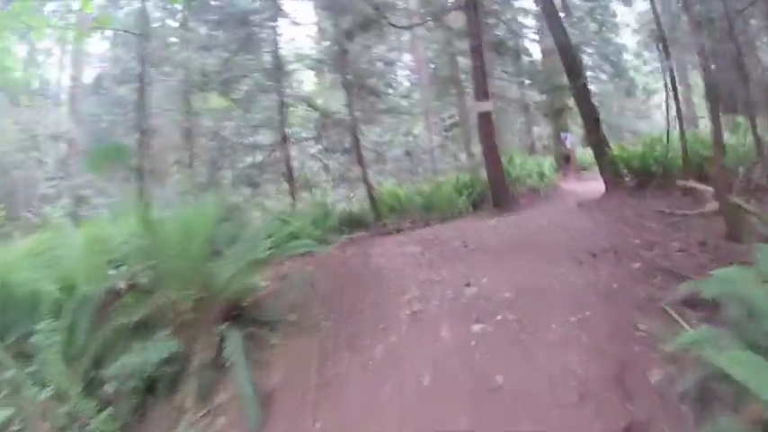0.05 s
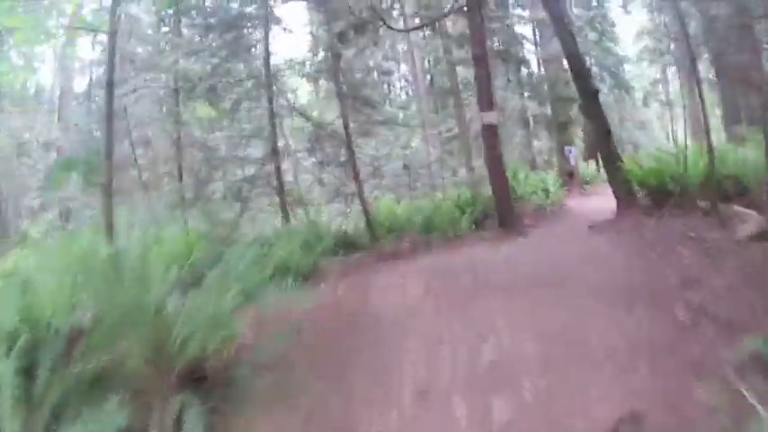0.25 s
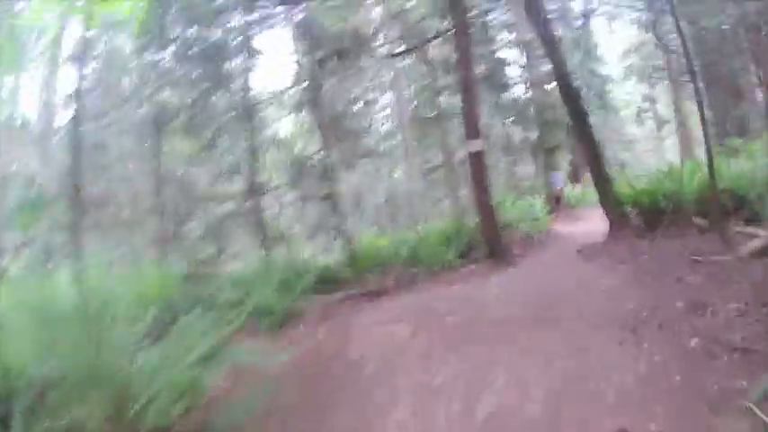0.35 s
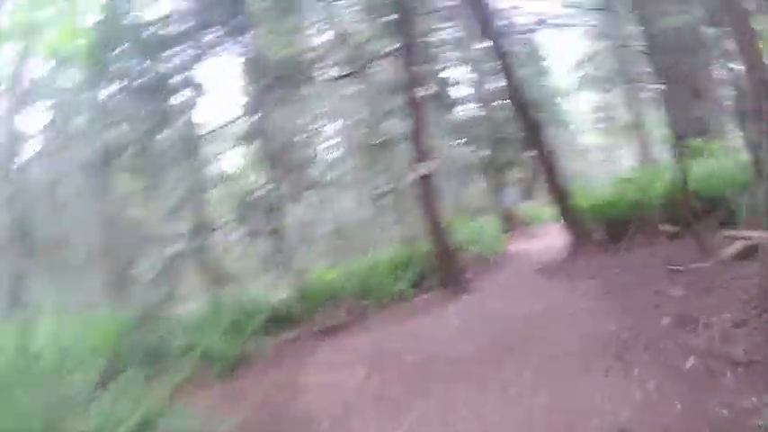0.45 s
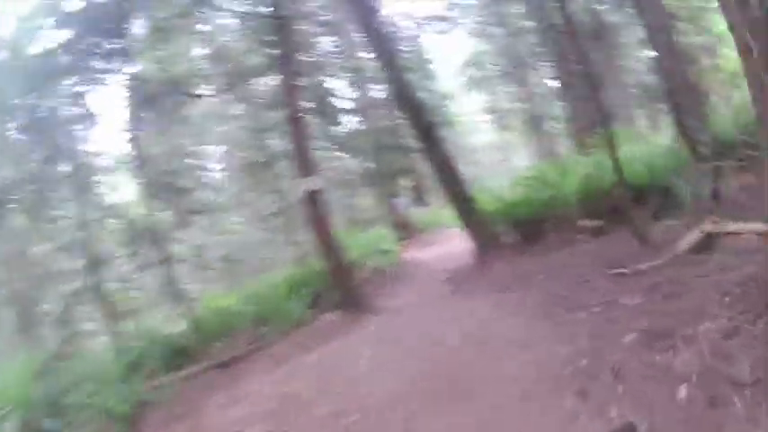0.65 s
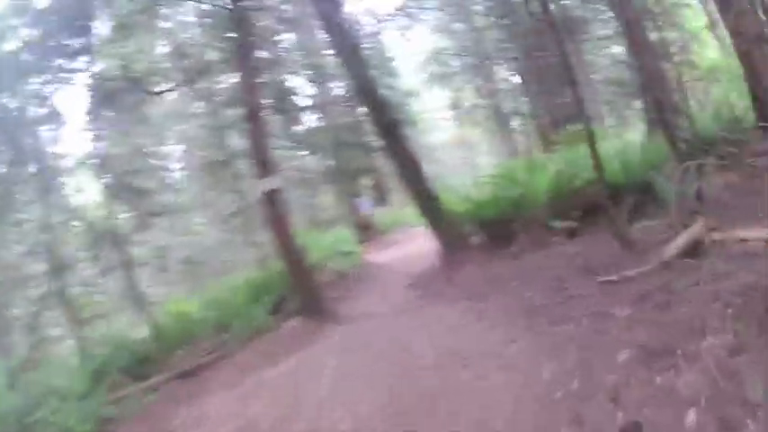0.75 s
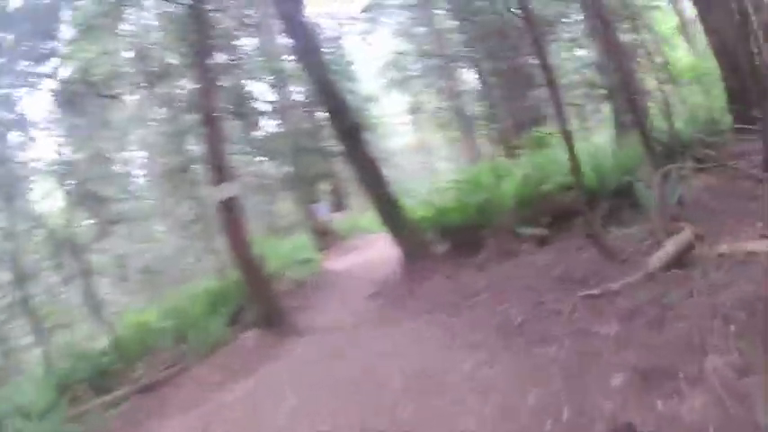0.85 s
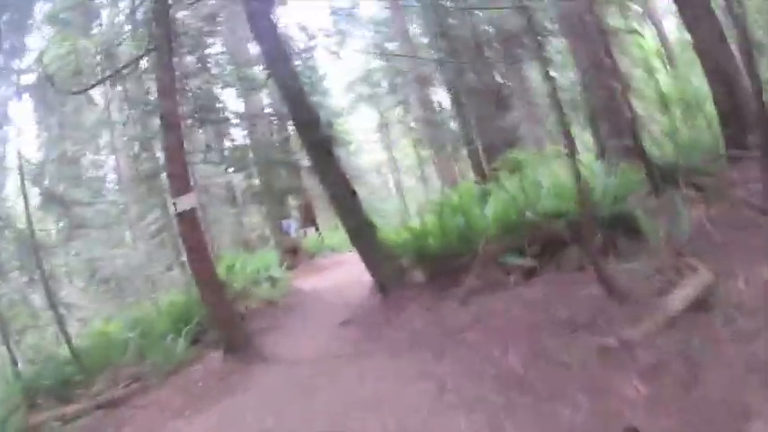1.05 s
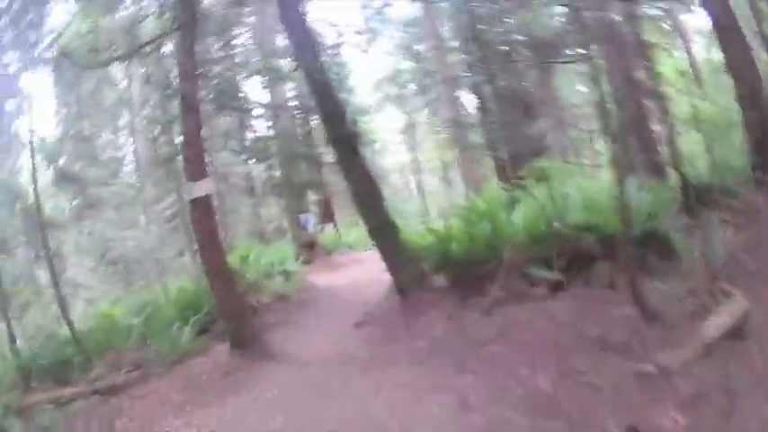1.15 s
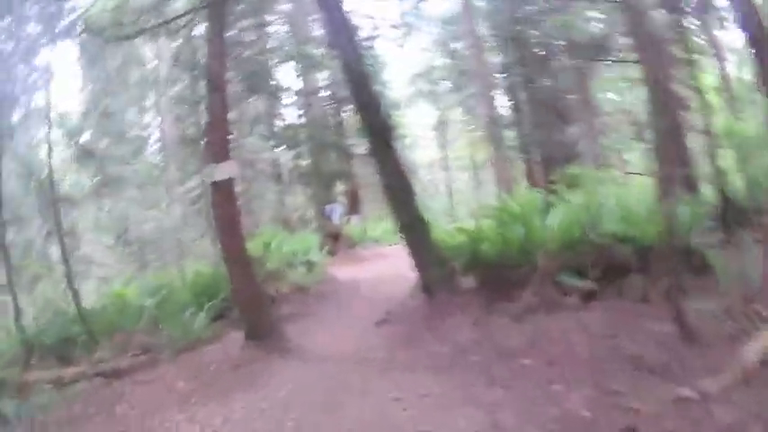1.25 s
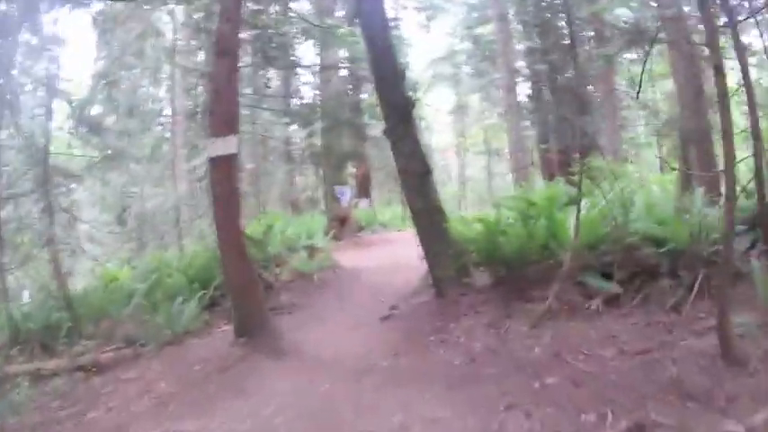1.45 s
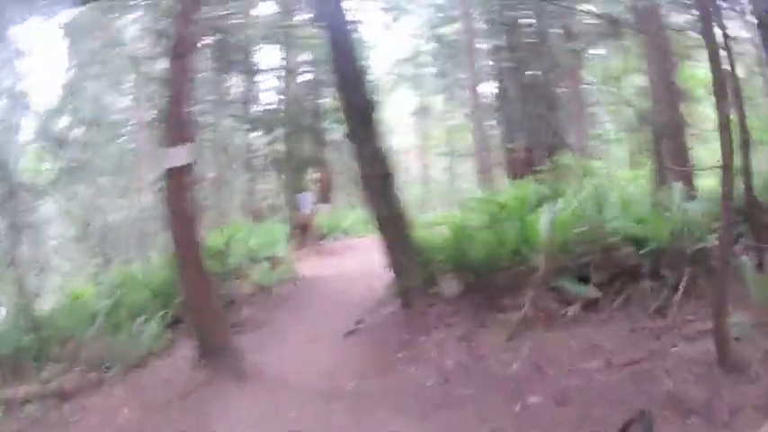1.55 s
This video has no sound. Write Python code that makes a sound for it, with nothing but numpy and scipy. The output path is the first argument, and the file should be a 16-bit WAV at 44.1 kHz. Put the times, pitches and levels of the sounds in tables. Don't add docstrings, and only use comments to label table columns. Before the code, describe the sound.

A mountain bike rumbles over packed dirt, loose parts slapping and ticking sharply, then calming

```python
import sys
import numpy as np
from scipy import signal
from scipy.io import wavfile

SR = 44100
rng = np.random.default_rng(int(sys.argv[2]) if len(sys.argv) > 2 else 0)


def field_ratio(decibels):
    return 10 ** (np.asarray(decibels, dtype=float) / 20)


def digitize_waveform(pressure):
    field = np.atleast_2d(pressure).T
    bounded = np.clip(field, -1, 1)
    quanta = np.round(bounded * 32767).astype(np.int16)
    wavfile.write(sys.argv[1], SR, quanta)


N = 70560

# start_s, peak_db, frame_pitch_hz, fade_60db_s, tyre_squeeze_db
BUMPS = [(0.117, -36, 255, 0.16, -54), (0.171, -27.5, 293, 0.044, -74), (.198, -28, 216, 0.097, -35),
         (.289, -33, 286, 0.17, -38.5), (.35, -32, 240, 0.048, -50), (0.41, -38.5, 273.6, 0.45, -31.5),
         (0.452, -39, 278.2, 0.23, -53), (0.532, -24.5, 248, 0.059, -71), (0.641, -25.5, 286, 0.033, -35),
         (0.766, -44, 254, 0.17, -29), (0.801, -26.5, 205, 0.11, -33.5), (0.873, -26.5, 256, 0.057, -41),
         (.969, -29, 282, 0.078, -34.5), (1.042, -43, 230, 0.15, -39), (1.134, -60.5, 256, 0.072, -39),
         (1.28, -32, 292, 0.061, -39.5), (1.336, -42, 262, 0.28, -34.5), (1.377, -39.5, 231.5, 0.15, -41),
         (1.501, -37, 268, 0.071, -42.5)]
# start_s, peak_db, contact_s, ring_db, side_tones_db
SLAPS = [
    (0.2996, -6.5, 0.0031, -26, 2.5),
    (0.3509, -11.5, 0.0035, -10.5, 3),
    (0.5338, -5.5, 0.0029, -7.5, 1.5),
    (1.5594, -35.5, 0.0022, 0, 10),
]
# start_s, peak_db, pitch_hz
RATTLES = [(0.269, -46, 2840), (0.4358, -18, 3900), (0.4858, -40.5, 3050), (0.7038, -52, 2810),
           (0.7673, -18, 3765), (0.856, -42, 4170), (0.9008, -45, 3550), (0.9207, -21, 3740),
           (0.9605, -38.5, 3890), (0.9956, -46.5, 4530), (1.2838, -43, 3600), (1.3898, -42, 4100)]
# start_s, peak_db, pitch_hz
TICKS = [
    (0.5705, -12.5, 2340),
    (0.7813, -26, 1950),
    (0.8044, -12, 2380),
    (0.969, -41, 2680),
]
# time_s, level_db
GRIT = [
    (0.0, -62.5),
    (0.19, -61.5),
    (0.41, -59),
    (0.814, -61),
    (0.97, -64),
    (1.144, -64),
    (1.6, -63),
]
ONSET_DELAY_S = 0.00099


def rms_one(x):
    return x / np.sqrt(np.mean(x ** 2) + 1e-20)


def curve(rows):
    return np.interp(np.arange(N) / SR, *np.transpose(rows))


def drift(rate_hz):
    r = np.exp(-32 * np.pi * rate_hz / SR)
    slow = signal.lfilter([1], [1, -2 * r, r * r], rng.standard_normal(N // 16 + 3002))
    slow = slow[3000:]
    return np.interp(np.arange(N) / 16, np.arange(len(slow)), rms_one(slow))


def butter(x, order, hz, kind="low"):
    return signal.sosfilt(signal.butter(order, hz, kind, fs=SR, output="sos"), x)


def resonate(x, hz, width_hz):
    r = np.exp(-np.pi * width_hz / SR)
    poles = [1, -2 * r * np.cos(2 * np.pi * hz / SR), r * r]
    return signal.lfilter([(1 - r * r) / 2, 0, (r * r - 1) / 2], poles, x)


def coloured(spectrum, patchy_db):
    hz, db = np.transpose(spectrum)
    edges = 16800 / 2 ** np.arange(10, -.1, -1 / 3)
    white = rng.standard_normal((2, N))
    out = 0
    for k, (low, high) in enumerate(zip(edges, edges[1:])):
        if high > hz[0] / 2 and low < hz[-1] * 2:
            level_db = np.interp(np.log(low * high) / 2, np.log(hz), db)
            band = butter(white[k % 2], 2, [low, high], "band")
            out = out + field_ratio(level_db + patchy_db * drift(8)) * band
    return rms_one(out)


def since(s):
    return np.maximum(np.arange(N) / SR - s, 0)


def fade(t, t60):
    return field_ratio(-60 * t / t60)


def strike(s, hz, t60, rise_s):
    t = since(s)
    return np.sin(2 * np.pi * hz * t) * np.minimum(t / rise_s, 1) * fade(t, t60)


def load():
    # time_s, level_db
    rolling = [
        (0, -51),
        (.07, -45.5),
        (.26, -45.5),
        (.5, -49),
        (.72, -58),
        (.94, -51.5),
        (1.25, -49),
        (1.45, -47.5),
        (1.6, -47),
    ]
    power = field_ratio(2 * curve(rolling))
    for s, db, hz, t60, squeeze_db in BUMPS:
        t = since(s)
        squeeze = np.minimum(t / 0.014, 1) * fade(t, 0.35)
        power = power + field_ratio(2 * squeeze_db) * squeeze ** 2
    return 10 * np.log10(power)


def tyre(load_db):
    pitch_hz, width_hz, octave_db, evenness = 96.6, 10, -17, 0.8
    hum = resonate(rng.standard_normal(N), pitch_hz, width_hz)
    hum = signal.hilbert(resonate(hum, pitch_hz, 2 * width_hz))
    hum = hum / (np.abs(hum) + 1e-9) ** evenness
    hum = hum / np.std(hum.real)
    octave = (hum ** 2).real
    return field_ratio(load_db) * (hum.real + field_ratio(octave_db + load_db - load_db.max()) * octave)


def frame(load_db):
    # pitch_hz, width_hz, level_db
    resonances = [(57.5, 24, -51.5), (226, 75, -52.5), (264, 40.5, -52), (327, 22, -59), (442, 80, -59),
                  (563, 270, -73.5)]
    stones_per_s, follows_load, follows_grit = 250, 0.49, 1.9
    hits = (rng.random(N) < stones_per_s / SR) * rng.standard_normal(N)
    stones = hits + 0.043 * rng.standard_normal(N)
    shaken = 0
    for k, (hz, width_hz, db) in enumerate(resonances):
        moved = np.roll(stones, 5000 * k)
        shaken = shaken + field_ratio(db) * rms_one(resonate(resonate(moved, hz, width_hz), hz, 2 * width_hz))
    thuds, rise_s = 0, 0.0061
    for s, db, hz, t60, squeeze_db in BUMPS:
        upper = field_ratio(-5) * strike(s, hz * 1.75, 0.27 * t60, rise_s)
        thuds = thuds + field_ratio(db) * (strike(s, hz, t60, rise_s) + upper)
    follow_db = follows_load * (load_db - load_db.mean()) + follows_grit * (curve(GRIT) + 61.5)
    return field_ratio(follow_db) * shaken + thuds


def slaps():
    # pitch_hz, level_db
    tones = [(2480, -9.5), (2830, 0), (3650, -16), (4430, -17), (4930, -15.5), (5300, -18.5), (6750, -14),
             (7600, -23), (8900, -22.5), (10680, -19.5), (11700, -28), (12850, -25.5), (14580, -23),
             (15600, -38)]
    # pitch_hz, level_db, fade_60db_s
    knocks = [(461, -19.5, 0.032), (720, -35.5, 0.012), (1028, -6.5, 0.0087), (1400, -4.5, 0.0051)]
    ring_t60_s, side_top_hz, spread_db = 0.014, 5600, 1.5
    out, chance = 0, rng.random((len(SLAPS), len(tones), 2))
    for (s, db, length, ring_db, side_db), row in zip(SLAPS, chance):
        t = since(s - .0003)
        touch = np.minimum(t / length, 1)
        contact = np.sin(np.pi * touch ** 0.9) ** 0.67
        contact = contact + field_ratio(ring_db) * touch * fade(t - length, ring_t60_s)
        chatter = 0
        for (hz, tone_db), (phase, luck) in zip(tones, row):
            if tone_db < -4:
                tone_db = tone_db + side_db * (hz < side_top_hz) + spread_db * (2 * luck - 2)
            chatter = chatter + field_ratio(tone_db) * np.sin(2 * np.pi * (hz * t + phase))
        out = out + field_ratio(db - 5.0) * contact * chatter
        for k, (hz, knock_db, t60) in enumerate(knocks):
            level_db = db + knock_db + 0.11 * (db + 8)
            out = out + field_ratio(level_db) * (-1) ** k * strike(s, hz, t60, 0.00098)
    return out


def clicks(events, modes, rise_s, crack_db):
    spread_db = rng.normal(0, 0.72, (len(events), len(modes)))
    rings, impulse = 0, np.zeros(N)
    for (s, db, hz), row in zip(events, spread_db):
        for (ratio, mode_db, t60), extra_db in zip(modes, row):
            tone = strike(s + ONSET_DELAY_S, min(hz * ratio, 16000), t60, rise_s)
            rings = rings + field_ratio(db + mode_db + extra_db + 1) * tone
        impulse[int((s + ONSET_DELAY_S + rise_s) * SR)] = -field_ratio(db + crack_db)
    return rings + butter(butter(impulse, 2, 2700, "high"), 1, 5070)


def rattles():
    # pitch_ratio, level_db, fade_60db_s
    modes = [(.29, -25, 0.014), (.81, -8, 0.011), (1, 0.5, 0.0063), (1.31, -17.5, 0.013),
             (2.03, -16, 0.0052), (3.05, -17.5, 0.0034), (4.0, -25, 0.0043)]
    rebound = (.5378, -15.5, 3870)  # start_s, peak_db, pitch_hz
    return clicks([*RATTLES, rebound], modes, rise_s=0.00052, crack_db=-16)


def ticks():
    # pitch_ratio, level_db, fade_60db_s
    modes = [(1, 0, .003), (1.5, -5, .002), (2.1, -12, .0015)]
    return butter(clicks(TICKS, modes, rise_s=0.00025, crack_db=-5), 3, 1500, "high")


def scatter():
    # pitch_hz, level_db
    colour = [(350, 1), (600, -3.5), (1900, -6), (2920, -0.5), (5150, -2.5), (6000, -10), (14400, -25),
              (16500, -38)]
    # start_s, peak_db, knock_db, knock_hz, fade_60db_s
    scuffs = [(0.067, -57.5, -46, 783, 0.095), (.11, -60.5, -45, 620, .05), (0.201, -57, -52.5, 940, 0.062),
              (0.287, -56, -51, 1400, 0.045), (0.41, -47.5, -41.5, 1010, 0.085),
              (0.751, -39.5, -34.5, 1005, 0.064), (0.808, -80, -35.5, 556, 0.045),
              (0.919, -59, -44.5, 1166, 0.013), (.922, -68, -44, 534, 0.016), (0.968, -57, -48, 920, 0.048),
              (1.116, -73, -55, 1074, 0.033), (1.226, -60, -57.5, 900, 0.03),
              (1.258, -60.5, -62, 1210, 0.074), (1.38, -59, -59, 950, 0.059)]
    light_db, tick_db = -3, -7
    hits = [(e[0], e[1]) for e in SLAPS]
    hits += [(s, db + light_db) for s, db, hz in RATTLES]
    hits += [(s, db + tick_db + light_db) for s, db, hz in TICKS]
    strength, knock = 0, 0
    for s, db in hits:
        t = since(s)
        tail = field_ratio(-17) * fade(t, 0.029) + field_ratio(-37) * fade(t, 0.11)
        strength = strength + field_ratio(db) * np.minimum(since(s + ONSET_DELAY_S) / 0.0012, 1) * tail
    for s, db, knock_db, hz, t60 in scuffs:
        t = since(s)
        strength = strength + field_ratio(db) * fade(t, t60) * np.minimum(t / .002, 1)
        knock = knock + field_ratio(knock_db) * strike(s, hz, 0.036, 0.0011)
    return strength * field_ratio(3.7 * drift(450)) * coloured(colour, patchy_db=0.5) + knock


def grit():
    # pitch_hz, level_db
    colour = [(500, -45), (800, -11.5), (2000, -3.5), (4700, -8.5), (5600, -16), (8200, -15), (9400, -24),
              (15200, -28.5)]
    # pitch_hz, width_hz, level_db
    mount = [(980, 380, -5.5), (1900, 150, -14), (2730, 220, -6), (3830, 170, -7), (4340, 700, -6),
             (7340, 1300, -15.5), (11900, 1100, -19.5)]
    hiss = coloured(colour, patchy_db=0.6) * field_ratio(1.07 * drift(130) + 1.8 * drift(30))
    white, body = rng.standard_normal(N), 0
    for hz, width_hz, db in mount:
        ringing = rms_one(resonate(resonate(white, hz, width_hz), hz, width_hz))
        body = body + field_ratio(db + 1.5 * drift(4.3)) * ringing
    spray_s, spray_width_s, spray_db = 0.207, 0.034, -62.5
    spray = rms_one(butter(coloured(colour, patchy_db=-1.5), 2, 5000, "high"))
    swell = np.exp(-((np.arange(N) / SR - spray_s) / spray_width_s) ** 2)
    return field_ratio(curve(GRIT) - 4.0) * (hiss + body) + field_ratio(spray_db) * swell * spray


def rumble():
    # pitch_hz, level_db
    colour = [(20, -1.5), (43, -15.5), (100, -1), (166, -25), (272, -4), (450, -40.5), (700, -48)]
    return field_ratio(-50) * coloured(colour, patchy_db=-0.5)


def scene():
    load_db = load()
    body = butter(frame(load_db) + rumble(), 4, 760)
    parts = slaps() + rattles() + ticks() + scatter()
    return (tyre(load_db) + body + parts + grit())[None]


def band_limit(x):
    return signal.sosfilt(signal.butter(12, 16850, fs=SR, output="sos"), x)


def record(dry):
    overload, cutoff_hz = 0.55, 16300
    soft = overload * np.tanh(dry / overload)
    top_cut = signal.cheby2(8, 40, cutoff_hz + 700, fs=SR, output="sos")
    return band_limit(signal.sosfilt(top_cut, soft))


dry = scene()
out = record(dry)
digitize_waveform(out)
```